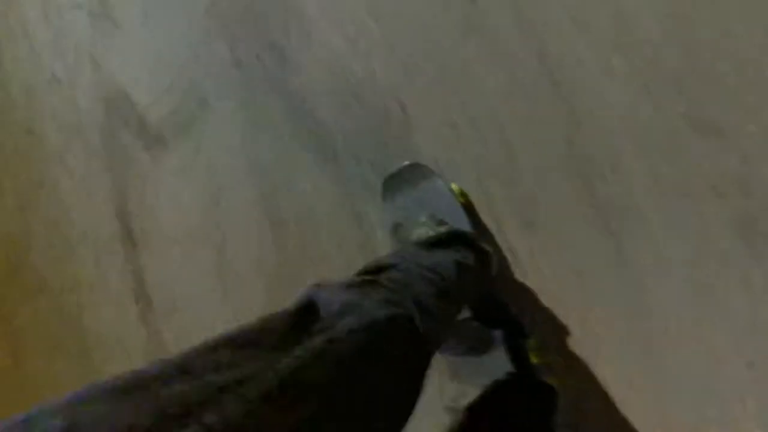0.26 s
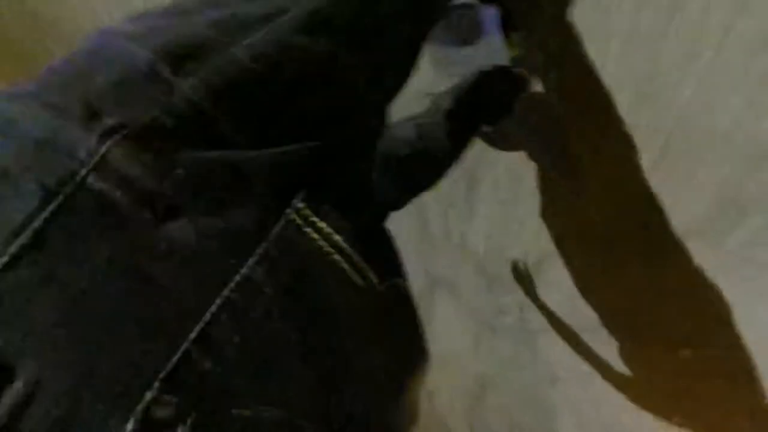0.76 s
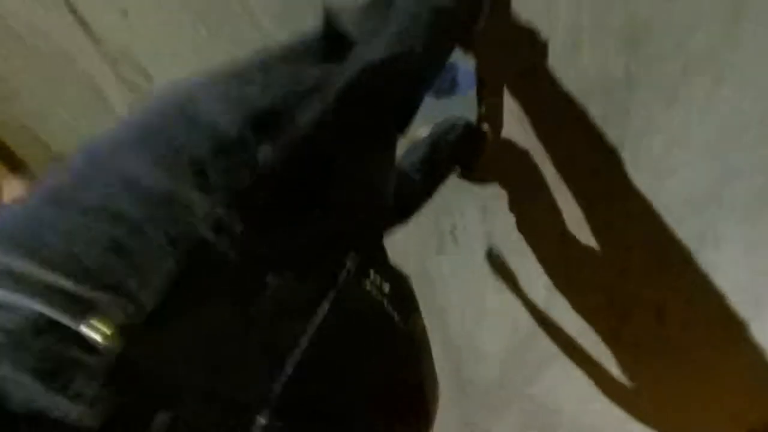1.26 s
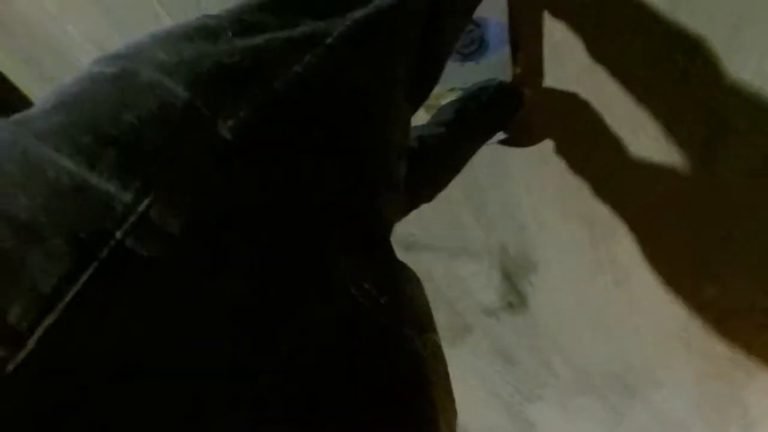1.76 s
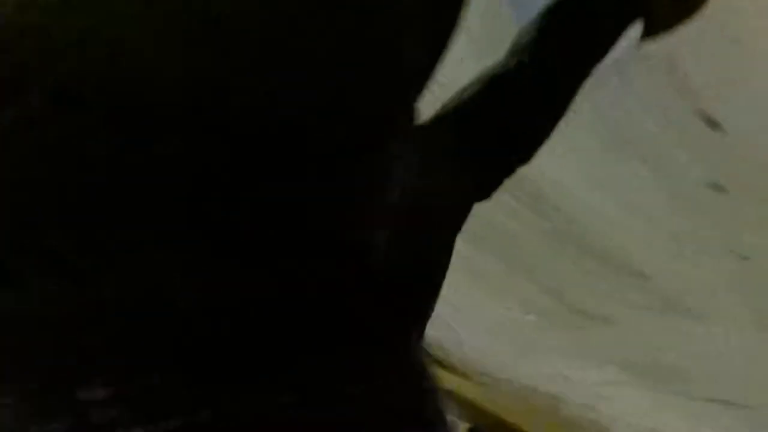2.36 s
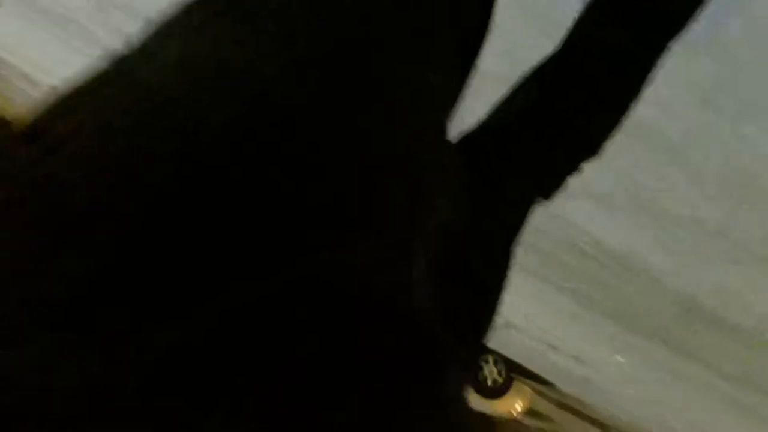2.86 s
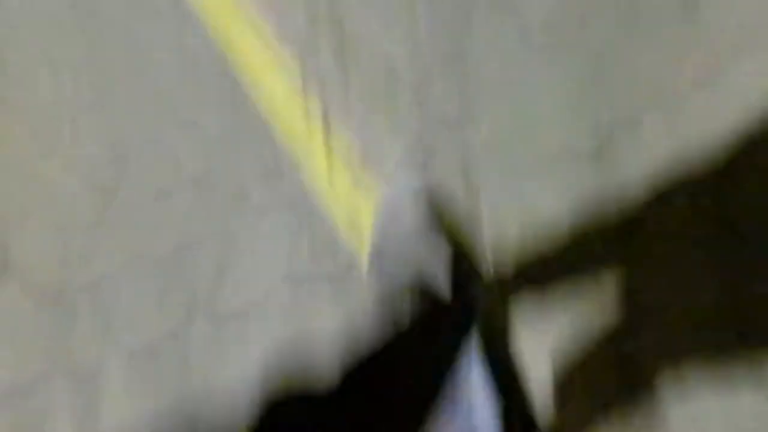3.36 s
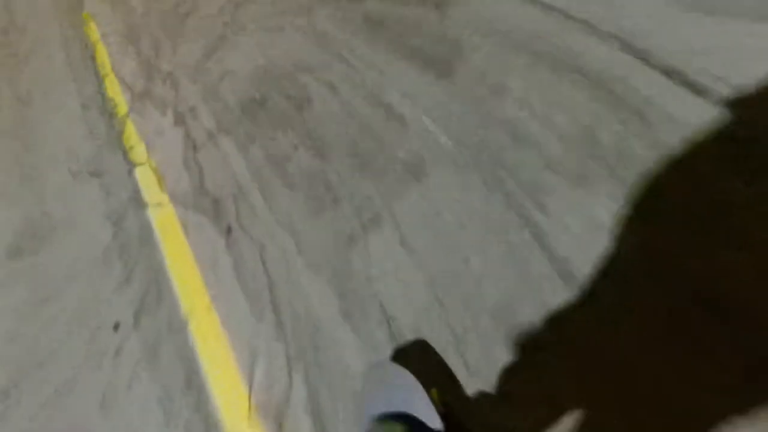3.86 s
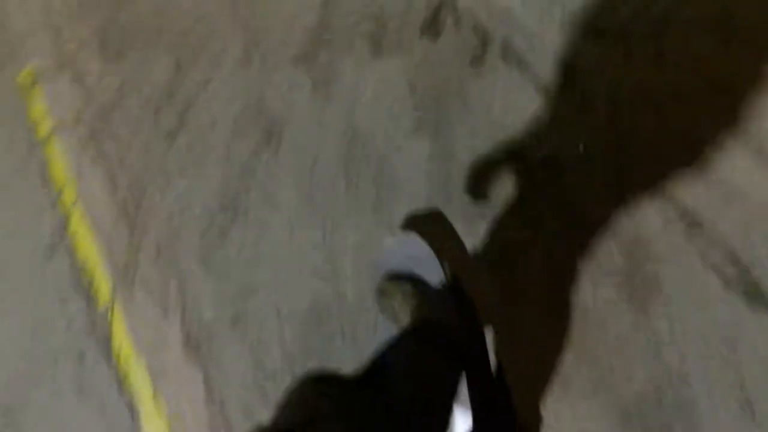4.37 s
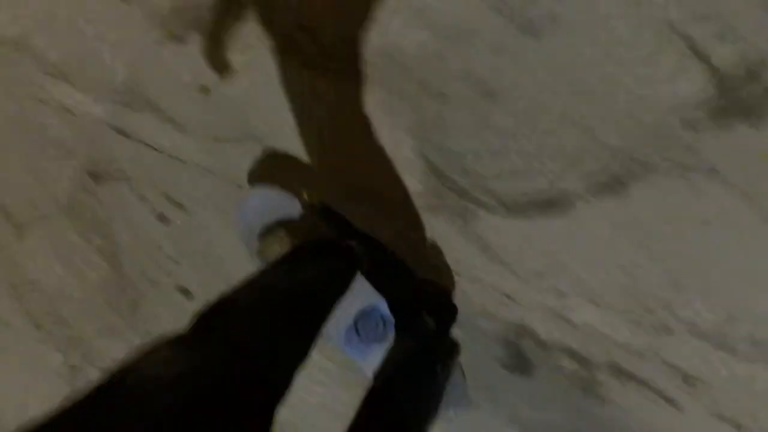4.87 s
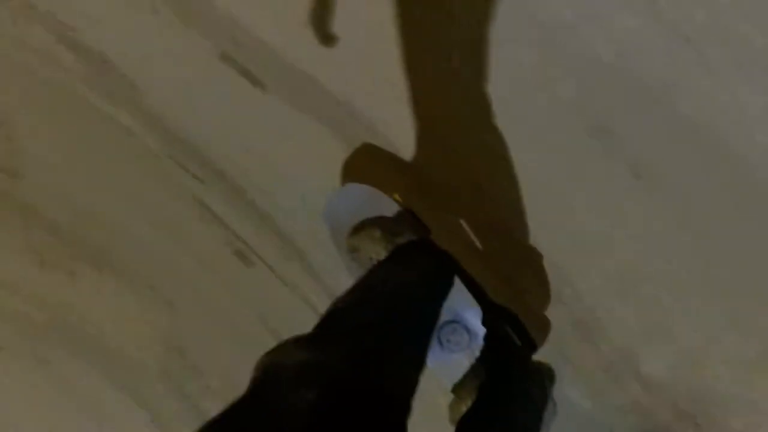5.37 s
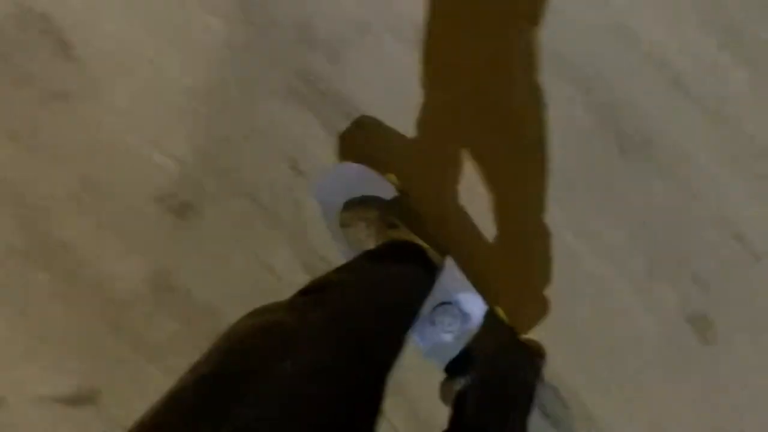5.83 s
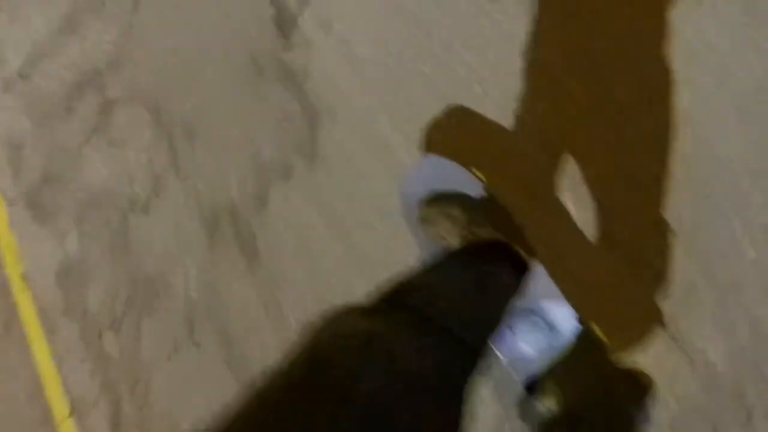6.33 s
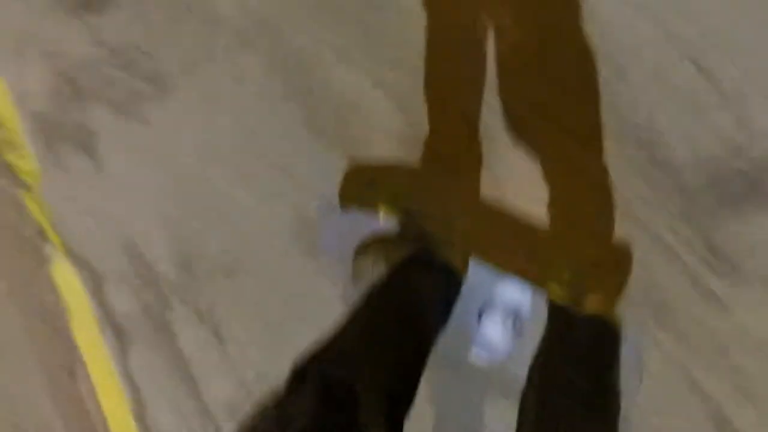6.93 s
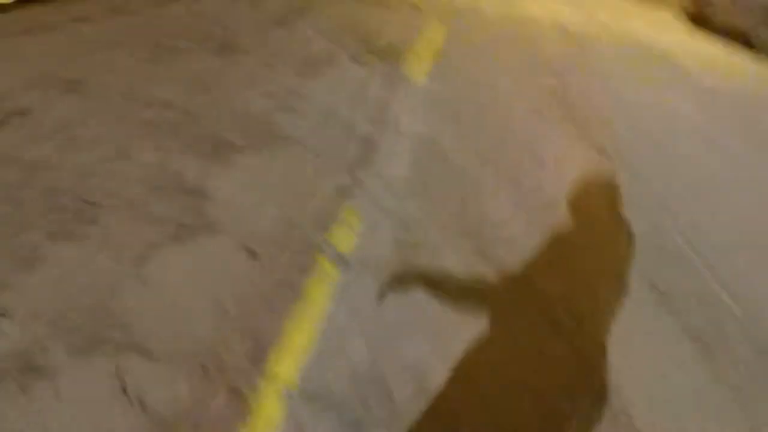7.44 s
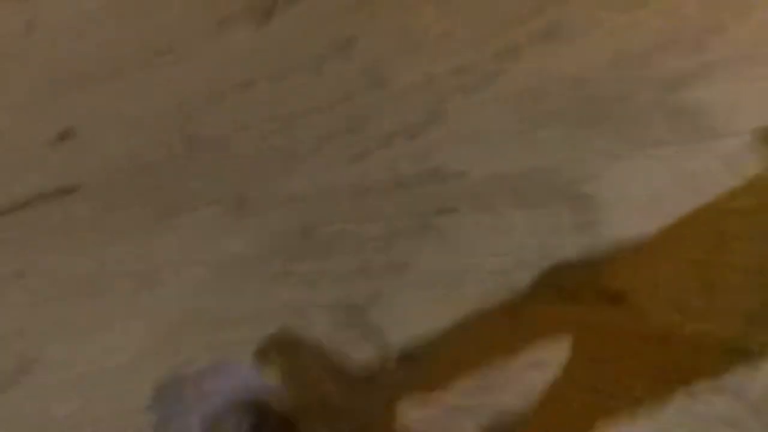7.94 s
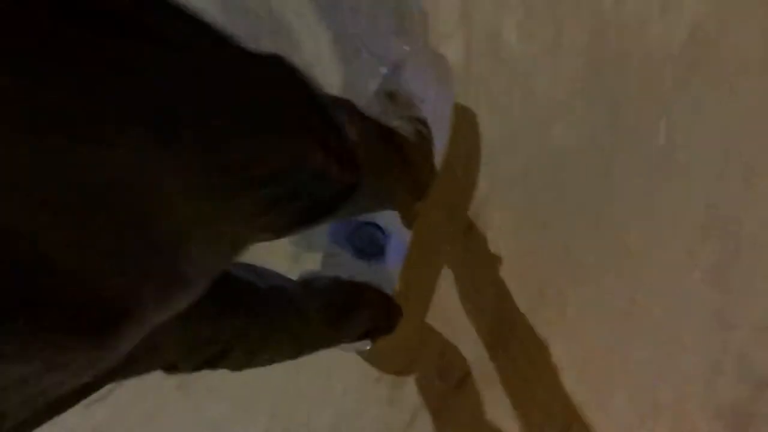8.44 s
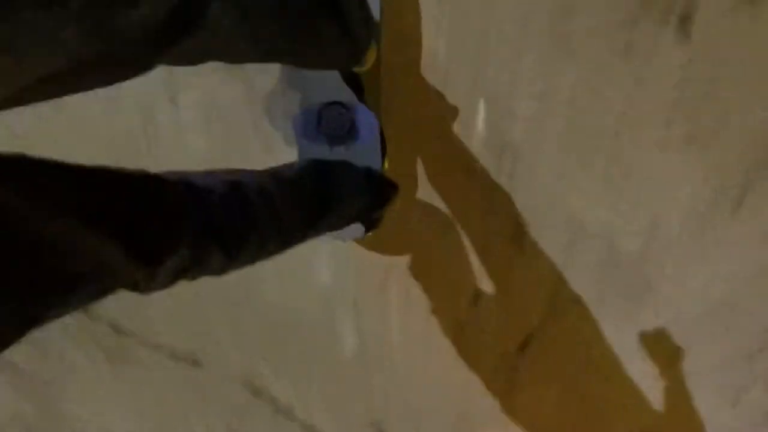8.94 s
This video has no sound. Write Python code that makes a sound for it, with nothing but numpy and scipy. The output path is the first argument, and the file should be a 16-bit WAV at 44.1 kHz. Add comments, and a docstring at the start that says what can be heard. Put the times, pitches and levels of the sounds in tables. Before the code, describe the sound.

A skateboard rolls over rough asphalt with a steady, loud rumble, knocking over cracks while wind buffets the microphone.

```python
"""Skateboard on rough asphalt

A skateboard rolls along, heard from a small microphone worn by the rider. Grit shakes the
wheels and makes the wooden deck (the board) ring, while the metal trucks (the axle mounts)
rattle and tick. Cracks in the road knock both, the wheels rasp as they slide sideways in
turns, and the headwind buffets the microphone."""
import sys
import numpy as np
from scipy import signal
from scipy.fft import rfft, irfft, next_fast_len
from scipy.io import wavfile
from scipy.ndimage import map_coordinates

SR = 44100
rng = np.random.default_rng(int(sys.argv[2]) if len(sys.argv) > 2 else 0)


def dump_mix(stems):
    """Bounce the given channels to the path in sys.argv[1] as a 16-bit WAV at rate SR."""
    frames = np.atleast_2d(stems).T  # one column per channel
    limited = np.clip(frames, -1, 1)  # hard clip at full scale
    pcm = np.round(limited * 32767).astype(np.int16)
    wavfile.write(sys.argv[1], SR, pcm)


N = 405719

# The steady headwind: time_s, level_db
HEADWIND = [(0, -38), (3.1, -40), (3.3, -40), (4.4, -42.5), (5.1, -36.5), (5.5, -40), (7, -43),
            (7.6, -32.5), (8.4, -42), (9.2, -44)]
# Gusts of wind: middle_s, length_s, rumble_db, flap_db
WIND_GUSTS = [(0.03, 0.23, -33.5, -35), (0.851, 0.11, -25, -16.5), (1.062, 0.32, -29, -42),
              (1.443, 0.28, -31.5, -25), (2.307, 0.48, -36.5, -41), (2.774, 0.1, -28.5, -34),
              (2.905, 0.079, -24.5, -24), (3.078, 0.078, -25, -24.5), (6.864, 0.081, -34, -33),
              (7.337, 0.23, -22, -21), (7.647, 0.28, -53, -30), (8.639, 0.082, -24, -18.5),
              (8.744, 0.15, -36, -19)]
# Tone of the wind's low rumble: pitch_hz, level_db
WIND_RUMBLE_TONE = [(10, -21), (25, 3), (50, 4.5), (90, 0), (150, -7), (300, -39)]
# Tone of the wind's higher flapping: pitch_hz, level_db
WIND_FLAP_TONE = [(60, -15.5), (110, -10), (200, -5.5), (350, -11)]
# Tone of a faint, high hiss: pitch_hz, level_db
HISS_TONE = [(6000, -15.5), (9000, -8.5), (12000, -8.5), (13500, -12), (15300, -22)]
# Tone of sizzling grit: pitch_hz, level_db
GRIT_TONE = [(4000, -20), (5800, -3), (7600, -5.5), (9200, -10.5), (10500, -24), (13000, -44.5)]
# Tone of rubber sliding on the road: pitch_hz, level_db
SLIDE_TONE = [(500, -12), (850, 4.5), (1300, -6.5), (1800, -13), (2600, -36)]

# Modes are the pitches an object rings at; a wider mode dies away sooner.
# Modes of small steel parts: pitch_hz, width_hz, level_db
STEEL_MODES = [(8300, 600, -1.5), (4800, 400, 2)]
# The deck mode that a slide sets humming: pitch_hz, width_hz, level_db
SLIDE_HUM_MODES = [(860, 110, 0)]
# Modes of the metal trucks: pitch_hz, width_hz, level_db
TRUCK_MODES = [(2670, 1060, 0.5), (3800, 760, 3), (4570, 710, 2), (6100, 1400, -10)]
# The axles' broad, dead answer to a blow: pitch_hz, width_hz, level_db
AXLE_MODES = [(2060, 1200, 0.5)]
# Three sets of loose hardware, one list of modes each: pitch_hz, width_hz, level_db
HARDWARE_MODES = [
    [(2100, 240, 3), (2480, 560, 0.5)],
    [(1640, 150, -0.5), (1940, 110, -4)],
    [(1962, 140, 4.5), (2110, 280, 0), (2600, 250, -14)],
]
# The deck's lowest modes, its drone: pitch_hz, width_hz, level_db
DECK_LOW_MODES = [(184.4, 54.4, -2.5), (250, 55, -1.5), (298.6, 56, -3)]
# The deck's middle modes, its roar: pitch_hz, width_hz, level_db
DECK_MID_MODES = [(370.6, 97, -4), (461, 70, -2), (512.5, 45.3, 1.5), (641, 287, -11), (826, 97, -10)]
# The deck's upper modes, its ring: pitch_hz, width_hz, level_db
DECK_HIGH_MODES = [(1055.5, 102, -1), (1164, 90, 1), (1290, 267, -8.5)]
# The deck's roar with narrower, more ringing peaks: pitch_hz, width_hz, level_db
DECK_NARROW_MODES = [(391, 121, -6.5), (455, 52, -3), (520.2, 30, 0.5), (637, 70, -5), (827, 96, -14)]
# The deck damped under the feet, its thud: pitch_hz, width_hz, level_db
DECK_THUD_MODES = [(227, 150, -7), (490, 75, 6), (815, 60, -1)]

# How loud the steel parts ping: time_s, level_db
PING_LEVELS = [(0, -79), (3.1, -58), (3.3, -78.5), (7.1, -72.5), (7.35, -66), (8.0, -64.5), (8.45, -71),
               (8.7, -74.5), (9.2, -76)]
# Wheels sliding sideways in a turn: middle_s, length_s, rasp_db, hum_db
WHEEL_SLIDES = [(0.84, 0.051, -29.5, -26), (0.92, 0.039, -27, -28), (1.095, 0.14, -28.5, -34),
                (6.19, 0.18, -42, -28), (6.362, 0.075, -31, -30)]
# How loud the rolling sounds; the level dips after the loud knock near 3.1 s, then recovers:
# time_s, roar_db, ring_over_roar_db
ROLL_LEVELS = [(0, -15.5, -19), (.82, -15.5, -19), (1.0, -16, -20), (1.1, -11.5, -19), (1.2, -17.5, -15.5),
               (1.75, -15, -17.5), (2.8, -15, -20), (3.13, -16, -19.5), (3.17, -23.5, -17),
               (3.7, -22, -20.5), (4.0, -17.5, -18), (4.35, -18, -21), (4.55, -15.5, -21.5),
               (4.66, -15, -20.5), (5.05, -15, -19), (5.4, -15.5, -18.5), (5.75, -15, -17.5),
               (6.15, -17, -21), (6.7, -15.5, -15), (7.1, -18.5, -15), (7.8, -21, -13.5), (8.2, -16, -16.5),
               (8.65, -17, -18.5), (8.95, -17, -13.5), (9.2, -14.5, -20.5)]
# Slow drift of the mix: time_s, drone_lift_db, scrape_lift_db, sizzle_over_roar_db, hiss_db
MIX_DRIFT = [(0, -1, 0.5, -41.5, -74), (1.5, -4.5, -0.5, -40, -71), (3.13, -3, -1, -42.5, -77),
             (3.4, -1, 1.5, -42, -71), (4.2, -1.5, -0.5, -46, -70), (5, -3, 1.5, -50, -66),
             (6.8, 2, 2, -52.5, -72.5), (7.4, 0, -1, -41, -64.5), (7.9, 3.5, -3, -49, -66),
             (8.3, -2, 1.5, -50, -72.5), (9.2, -1.5, 0, -49, -70)]
# Road stretches that change the shaking of metal and grit: middle_s, length_s, roughness_db
ROAD_STRETCHES = [(0.62, 0.24, 2), (1.1, 0.13, -14.5), (1.75, 0.19, 7), (2.4, 0.087, 4.5),
                  (3.95, 0.067, 7.5), (4.55, 0.22, 5), (5.58, 0.25, 9), (6.12, 0.06, 7), (6.33, 0.26, 10),
                  (7.62, 0.13, 10.5), (8.35, 0.32, 8.5), (9.05, 0.095, 8)]
# The tone of the rattle and roar changes slowly, blending between sets of modes:
# time_s, hardware_1_share, hardware_2_share, hardware_3_share, narrow_roar_share
TONE_DRIFT = [(0, 0.38, 0.024, 0.07, 0), (3.1, 1, 0.051, 0.16, 0.25), (3.5, 0.017, 0.52, 0.37, 0.086),
              (4.3, 0, 1, 0.015, 0), (4.7, 0.3, 0.057, 0.15, 0.41), (6.1, 0.072, 0.051, 0.27, 0.85),
              (9.2, 0.13, 0.0096, 0.68, 0.92)]
# The board's lean, from 0 (low pitch) to 1 (high pitch): time_s, lean
BOARD_LEAN = [(0, 0.38), (4.2, 0.56), (5.2, 0.3), (5.9, 1), (6.5, 0.62), (7.8, 1), (8.7, 0.42), (9.2, 1)]
# Wheels hitting cracks and stones: start_s, clack_db, thud_peak_db, tick_db
ROAD_KNOCKS = [(0.0809, -28, -9, -37.5), (0.2105, -20.5, -10, -33), (0.3342, -18, -3.5, -34.5),
               (0.484, -33, -2, -43.5), (0.512, -19, -19, -37.5), (0.5748, -18.5, -4, -27.5),
               (0.6757, -14, -4, -29.5), (0.8128, -22, -0.5, -45), (1.1897, -19, -15, -43.5),
               (1.209, -22, -2, -40), (1.277, -28, -8.5, -36.5), (1.339, -15.5, -26, -38.5),
               (1.3939, -16, -16, -34.5), (1.418, -21, -2, -38), (1.6545, -19, -6, -35),
               (1.732, -17.5, -6, -33.5), (1.7655, -20, -2.5, -26), (1.8182, -16.5, -18, -47),
               (1.9517, -20, -2.5, -37.5), (2.005, -26, -2, -31.5), (2.0462, -15, -20, -34),
               (2.1715, -15.5, -2, -34.5), (2.2845, -13.5, -8.5, -29.5), (2.4181, -23, -3.5, -38.5),
               (2.436, -32, -5, -48), (2.446, -27, -3.5, -37), (2.537, -16, -26, -33),
               (2.5686, -24, -20, -32.5), (2.583, -18, -4.5, -40), (2.6122, -18.5, -5.5, -37.5),
               (2.6266, -17, -20, -30), (2.684, -24, -2, -43), (2.9153, -15, 2.5, -30.5),
               (3.0523, -17, -22, -36.5), (3.0852, -17, -18, -33), (3.1432, -4.5, 2, -29.5),
               (3.2919, -15, -2.5, -39), (3.333, -22, -6, -40), (3.441, -14.5, -11, -42),
               (3.5364, -44, -29, -49), (3.587, -30, -23, -40), (3.613, -23, -21, -36.5),
               (3.6314, -19, -27, -37.5), (3.783, -21, -5.5, -38), (3.9024, -18, -16, -38.5),
               (3.976, -19, -18, -42), (3.995, -21, -28, -50.5), (4.1751, -39, -3, -49),
               (4.2885, -16, -6.5, -34.5), (4.402, -14, -12, -33), (4.527, -19, -15, -37.5),
               (4.8302, -23, -20, -44), (5.005, -19, -18, -37), (5.012, -30, -6, -48.5),
               (5.092, -14, -20, -42.5), (5.1169, -11, -7, -40), (5.343, -19, -3.5, -42.5),
               (5.649, -28, -16, -40), (5.7, -15.5, -7, -42.5), (5.995, -10, -20, -35.5),
               (6.059, -19, -27, -49), (6.101, -19, -3, -40), (6.2818, -20, -23, -39.5),
               (6.3691, -10, -8, -39.5), (6.442, -23, -10, -43), (6.4926, -10.5, -7, -45.5),
               (6.533, -14, -12, -41.5), (6.6538, -7.5, -9, -42.5), (6.776, -13, -16, -45),
               (6.8351, -16.5, -7, -39), (6.86, -21, -14, -45), (6.9979, -17, -2.5, -33),
               (7.0709, -7, -6, -37.5), (7.1117, -17.5, -15, -43.5), (7.1426, -25, -12, -35.5),
               (7.2428, -12, -8, -34.5), (7.365, -20, -23, -40.5), (7.5002, -16.5, -28, -50.5),
               (7.572, -17, -15, -45.5), (7.6016, -16, -5, -44), (7.652, -14, -11, -48),
               (7.6885, -10.5, -4, -46), (7.7212, -12.5, -7, -53), (7.7682, -18, -4.5, -48.5),
               (7.9127, -22, -12, -41), (7.9516, -32, -3, -46), (8.212, -22, -14, -40),
               (8.273, -13, -11, -42), (8.3141, -21, -18, -42), (8.3519, -16, -18, -44),
               (8.4112, -13, -4.5, -38.5), (8.4375, -9, -17, -41.5), (8.4498, -17, -5, -40.5),
               (8.478, -19, -23, -44), (8.587, -32, -5, -42), (8.5967, -15.5, -8, -45.5),
               (8.62, -18, -10, -44.5), (8.83, -13.5, -12, -40.5), (8.935, -20, -20, -43),
               (8.9853, -22, -13, -41), (9.04, -11.5, -9, -33), (9.0609, -8, -4.5, -36.5),
               (9.1309, -18, -9, -47)]


def amp(db):
    """Turn decibels into a number to multiply a sound by."""
    return 10 ** (np.asarray(db) / 20)


def unit(x):
    """Scale a sound to an average (rms) level of 1."""
    return x / np.sqrt(np.mean(x ** 2) + 1e-20)


def curves(rows):
    """Join a table's points with lines: one curve for each column after the time."""
    times, *columns = np.transpose(rows)
    return [np.interp(np.arange(N) / SR, times, column) for column in columns]


def wobble(per_s):
    """A smooth curve through per_s random points a second."""
    at = np.arange(0, N + 64, 32)
    points = rng.standard_normal(int(N * per_s / SR) + 4)
    return np.interp(np.arange(N), at, map_coordinates(points, [at * per_s / SR]))


def swells(rows, order=2):
    """Add one hump for each (middle_s, length_s, height); a higher order flattens the tops."""
    t = np.arange(0, N + 200, 100) / SR
    humps = sum(height * np.exp(-(2 * (t - s) / length) ** order) for s, length, height in rows)
    return np.interp(np.arange(N) / SR, t, humps)


def swell_pair(rows):
    """Two volume curves of flat-topped humps, one for each of a table's two level columns."""
    return [swells([(row[0], row[1], amp(row[k])) for row in rows], order=4) for k in (2, 3)]


def filtered(x, response):
    """Pass a sound through a filter: a function that says how much of each pitch is kept."""
    size = next_fast_len(N + SR // 2)
    return irfft(rfft(x, size) * response(np.fft.rfftfreq(size, 1 / SR)), size)[..., :N]


def tone(points):
    """A filter drawn through (pitch_hz, level_db) points, shut beyond both ends."""
    hz, db = np.transpose(points)
    return lambda f: amp(np.interp(np.log(f + 1), np.log(hz), db, left=-120, right=-120))


def modes(table):
    """A filter that rings at each pitch in the table."""
    return lambda f: sum((-1) ** k * amp(db) * 1j * f * width / (hz * hz - f * f + 1j * f * width)
                         for k, (hz, width, db) in enumerate(table))


def body(table, low_hz, high_hz):
    """A ringing object: its modes, fading away below low_hz and above high_hz."""
    return lambda f: modes(table)(f) * (1j * f / (low_hz + 1j * f) * high_hz / (high_hz + 1j * f)) ** 2


def stones(per_s, spread_db, crunch_ms):
    """Short pushes from stones at random moments, varying in size up to a 7 dB cap."""
    when, chance = rng.random((int(per_s * N / SR), 2)).T
    size_db = np.minimum(-spread_db * np.log(chance + 1e-9), 7)
    impacts = np.bincount((when * N).astype(int), amp(size_db), N)
    t = np.arange(SR // 40) / SR * 1000 / crunch_ms
    return unit(signal.oaconvolve(impacts, t * np.exp(-t))[:N])


def shaken(response, crunch, share, flutter_db):
    """Shake an object with fine road noise plus a share of stone crunches; the level comes out as 1."""
    share = np.clip(share, 0, 1)
    force = np.sqrt(1 - share + share * crunch ** 2) * rng.standard_normal(N)
    return unit(filtered(amp(flutter_db) * force, response))


def bursts(levels_db, rise_ms, response):
    """At each knock, a short spray of tiny contacts swells and dies, ringing an object."""
    t = np.arange(SR // 20) / SR * 1000 / rise_ms
    shape = t * np.exp(1 - t)
    shape_level = np.sqrt(np.mean(shape ** 2))
    force = np.zeros(N + SR)
    for (start_s, *_), db in zip(ROAD_KNOCKS, levels_db):
        spray = unit(shape * rng.standard_normal(len(t))) * shape_level
        force[round(start_s * SR):][:len(t)] += amp(db) * spray
    passed = np.sqrt(np.mean(np.abs(response(np.arange(SR // 2))) ** 2))  # how much noise gets through
    return filtered(force[:N], response) / passed


# These parts ring both while rolling and at each knock.
UPPER_DECK = body(DECK_HIGH_MODES, 800, 2100)
TRUCKS = body(TRUCK_MODES, 1900, 7000)
HARDWARE = [body(table, 1500, 3500) for table in HARDWARE_MODES]


def wind():
    """Lumps of air pressure rumble on the microphone; gusts set in quickly and flap higher up."""
    breeze = amp(curves(HEADWIND)[0] + 0.53 * wobble(7.3))
    lumps = amp(0.7 * wobble(14) + 2.5 * wobble(30))
    rumble = unit(filtered(lumps * rng.standard_normal(N), tone(WIND_RUMBLE_TONE)))
    flap = unit(filtered(lumps * rng.standard_normal(N), tone(WIND_FLAP_TONE)))
    gust_rumble, gust_flap = swell_pair(WIND_GUSTS)
    return (breeze + gust_rumble) * rumble + (amp(-21) * breeze + gust_flap) * flap


def steel_pings():
    """Now and then a flung grain strikes a small steel part."""
    grains = stones(25, spread_db=10.5, crunch_ms=1.2)
    pings = shaken(body(STEEL_MODES, 3000, 12000), grains, share=0.9, flutter_db=0)
    return amp(curves(PING_LEVELS)[0]) * pings


def wheel_slides():
    """Rubber dragged across the grit rasps briefly and sets the deck humming."""
    grains = stones(240, spread_db=14, crunch_ms=1.0)
    rasp = shaken(tone(SLIDE_TONE), grains, share=0.31, flutter_db=2.4 * wobble(35))
    hum = shaken(lambda f: modes(SLIDE_HUM_MODES)(f) ** 2, 1, share=0, flutter_db=2.1 * wobble(30))
    rasp_volume, hum_volume = swell_pair(WHEEL_SLIDES)
    return rasp_volume * rasp + hum_volume * hum


def high_hiss(coarse, patches_db):
    """A very high hiss that flickers."""
    grains = stones(40, spread_db=6, crunch_ms=1.5)
    return shaken(tone(HISS_TONE), grains, 0.5 * coarse, 0.6 * patches_db + 2.2 * wobble(16))


def grit_sizzle(ticks, coarse, patches_db):
    """Fine grit crackles under the wheels."""
    grains = 0.44 * ticks + stones(40, spread_db=8, crunch_ms=0.9)
    return shaken(tone(GRIT_TONE), grains, 0.49 * coarse, 2 * patches_db + 0.63 * wobble(41))


def truck_scrape(ticks, coarse, patches_db):
    """The road and flung grains shake the metal trucks into a bright scraping sound."""
    return shaken(TRUCKS, ticks, 0.23 * coarse, 1.4 * patches_db + 0.5 * wobble(25))


def hardware_rattle(chatter, coarse, patches_db):
    """Loose parts chatter; their tone slowly blends between three sets of modes."""
    shares = curves(TONE_DRIFT)[:3]
    return sum(np.sqrt(share) * shaken(part, chatter, coarse, 1.3 * patches_db)
               for share, part in zip(shares, HARDWARE))


def deck_roar(hits, patches_db):
    """The shaken deck roars, blending a broad tone with a narrower one at a lower and a higher pitch."""
    bend = 0.04  # the narrow tone's pitch sits 4% down or up
    narrow_share = curves(TONE_DRIFT)[3]
    lean = np.clip(curves(BOARD_LEAN)[0] + 0.3 * wobble(3), 0, 1)
    broad, narrow = body(DECK_MID_MODES, 200, 1100), body(DECK_NARROW_MODES, 200, 1100)
    roar = np.sqrt(1 - narrow_share) * shaken(broad, hits, 0.07, 0.56 * patches_db)
    for share, pitch in ((1 - lean, 1 - bend), (lean, 1 + bend)):
        ringing = shaken(lambda f: narrow(f / pitch), hits, 0.21, 1.2 * patches_db)
        roar += np.sqrt(share * narrow_share) * ringing
    return roar


def rolling():
    """The same stones and coarse patches of road shake the deck, trucks and grit together."""
    roar_db, ring_over_roar_db = curves(ROLL_LEVELS)
    ring_db = roar_db + ring_over_roar_db
    drone_lift_db, scrape_lift_db, sizzle_over_roar_db, hiss_db = curves(MIX_DRIFT)
    rough_db = swells(ROAD_STRETCHES)
    drone_db = roar_db - 3.5 + drone_lift_db
    rattle_db = ring_db - 12 + 0.88 * rough_db
    scrape_db = roar_db - 33 + scrape_lift_db + 0.34 * rough_db
    sizzle_db = roar_db + sizzle_over_roar_db + 0.44 * rough_db

    coarse = 0.47 + 0.025 * (-10.5 - roar_db)  # single stones stand out more as the roar sinks
    hits = stones(80, spread_db=9, crunch_ms=2.9)
    chatter = hits + 1.3 * stones(110, spread_db=5, crunch_ms=2.6)  # loose parts also clack on their own
    ticks = hits + 1.32 * stones(35, spread_db=9.5, crunch_ms=0.65)  # the wheels also fling grains
    patches_db = 0.71 * wobble(14) + 0.88 * wobble(40)

    roar = deck_roar(hits, patches_db) * amp(roar_db + 0.48 * wobble(12))
    drone = amp(drone_db) * shaken(body(DECK_LOW_MODES, 120, 600), hits, 0.12, 1.1 * patches_db)
    ring = amp(ring_db + 0.42 * wobble(14)) * shaken(UPPER_DECK, hits, 0.42, 1.4 * patches_db)
    rattle = amp(rattle_db) * hardware_rattle(chatter, coarse, patches_db)
    scrape = amp(scrape_db) * truck_scrape(ticks, coarse, patches_db)
    sizzle = amp(sizzle_db) * grit_sizzle(ticks, coarse, patches_db)
    hiss = amp(hiss_db) * high_hiss(coarse, patches_db)
    return roar + drone + ring + rattle + scrape + sizzle + hiss


def deck_thuds(start_s, peak_db):
    """Each blow passes through a soft wheel and thumps the deck under the rider's feet."""
    blows = np.zeros(N)
    blows[np.round(start_s * SR).astype(int)] = -amp(peak_db)
    push = np.hanning(SR // 700)  # the wheel spreads the blow over 1.4 ms
    thud = filtered(push, body(DECK_THUD_MODES, 120, 900))[:SR // 10]
    return signal.oaconvolve(blows, thud / np.abs(thud).max())[:N]


def knocks():
    """Each crack thumps and rings the deck, clacks the axles and hardware, and ticks the trucks."""
    start_s, clack_db, thud_db, tick_db = np.transpose(ROAD_KNOCKS)
    shares = curves(TONE_DRIFT)[:3]
    wood_db, metal_db = clack_db + 2 * rng.standard_normal((len(start_s), 2)).T  # no two knocks alike
    axles = bursts(clack_db - 23, 1.7, body(AXLE_MODES, 900, 3500))
    hardware = sum(np.sqrt(share) * bursts(metal_db - 21, 2.1, part)
                   for share, part in zip(shares, HARDWARE))
    ticks = bursts(tick_db - 2, 0.75, TRUCKS)
    grit = bursts(tick_db - 7.5, 0.6, tone(GRIT_TONE))
    ring = bursts(-26 + 0.52 * (wood_db + 17), 2.7, UPPER_DECK)  # the ring grows less than the clack
    return deck_thuds(start_s, thud_db) + ring + axles + hardware + ticks + grit


def scene():
    """Add up all the sounds at one microphone."""
    return (rolling() + knocks() + steel_pings() + wind() + wheel_slides())[None]


def record(dry):
    """Round off the loudest peaks, fade the last moment and remove the very highest pitches."""
    top_hz = 15200
    rounded = dry / (1 + np.abs(dry) ** 8) ** (1 / 8)
    fade = np.minimum(1, np.arange(N, 0, -1) / 200)
    return filtered(rounded * fade, lambda hz: hz < top_hz)


dry = scene()
out = record(dry)
dump_mix(out)
```